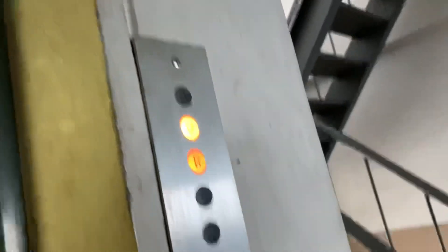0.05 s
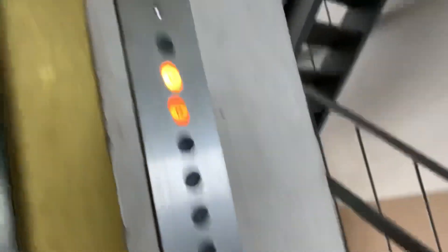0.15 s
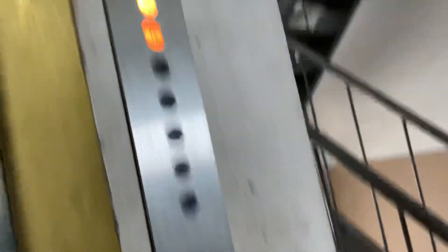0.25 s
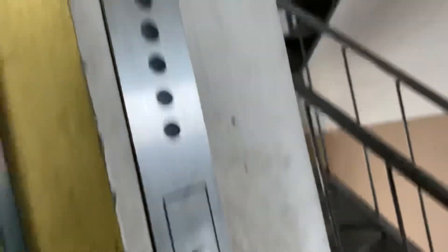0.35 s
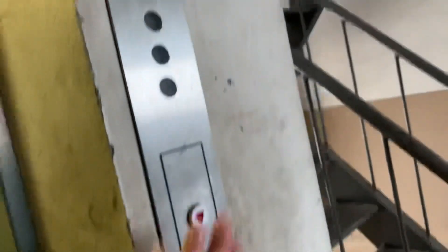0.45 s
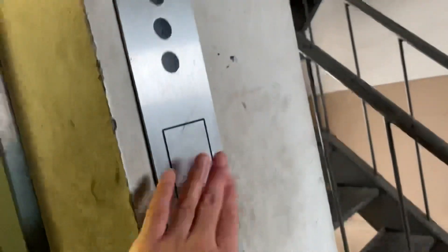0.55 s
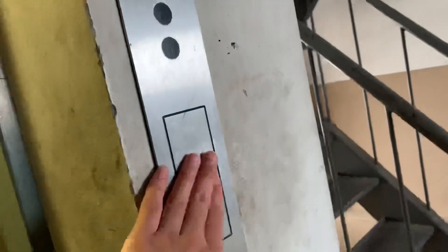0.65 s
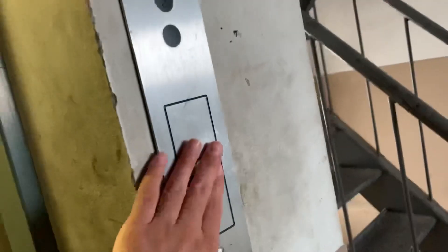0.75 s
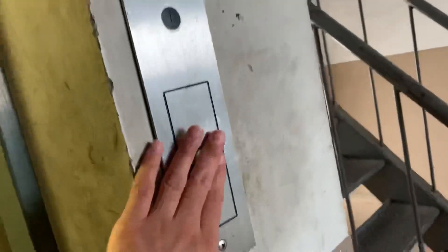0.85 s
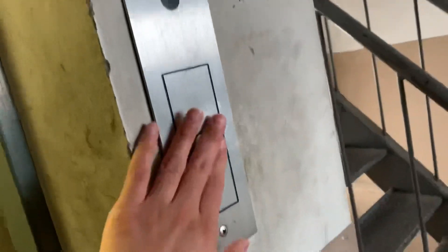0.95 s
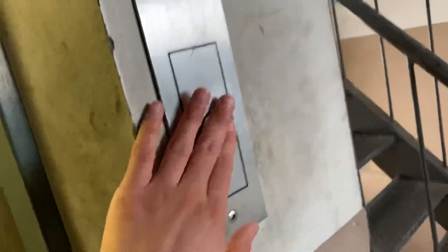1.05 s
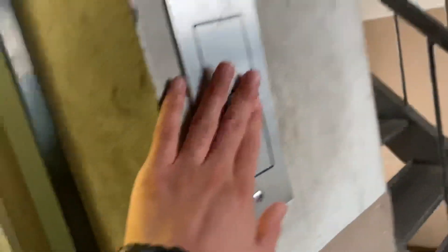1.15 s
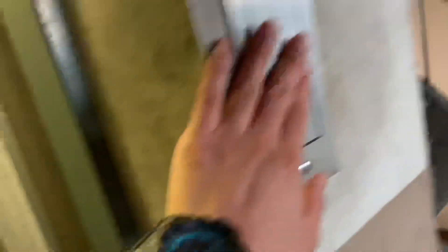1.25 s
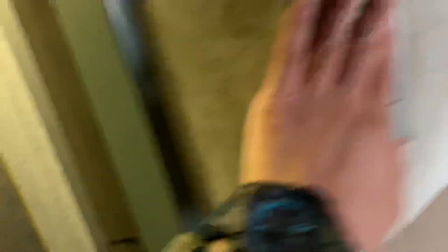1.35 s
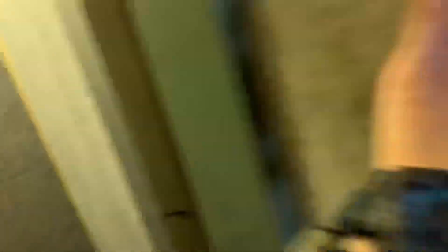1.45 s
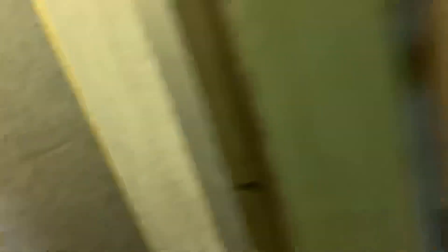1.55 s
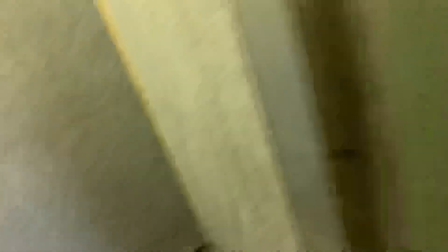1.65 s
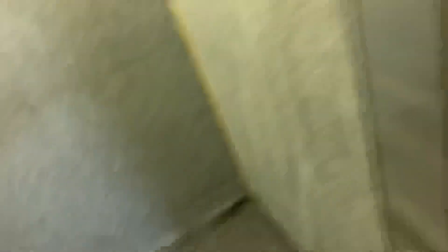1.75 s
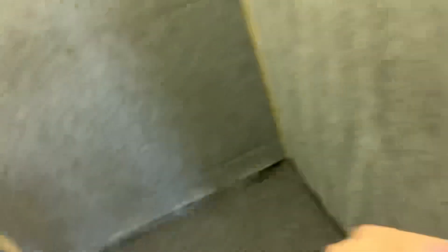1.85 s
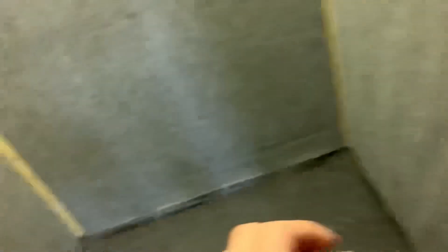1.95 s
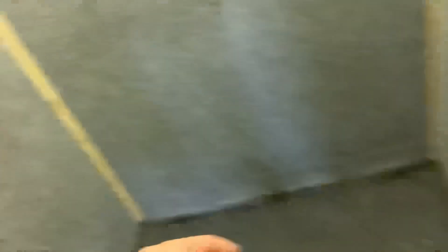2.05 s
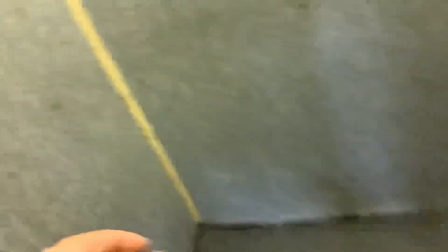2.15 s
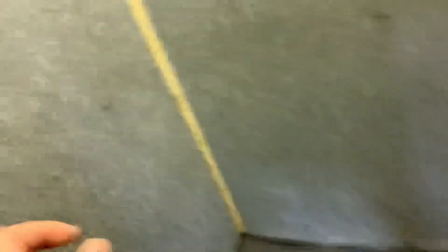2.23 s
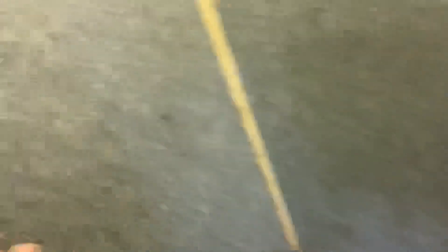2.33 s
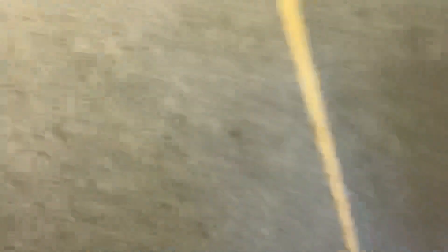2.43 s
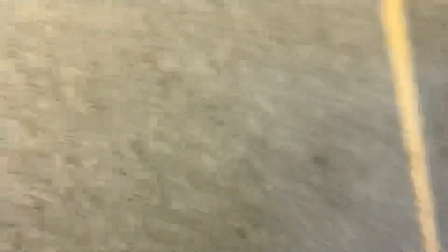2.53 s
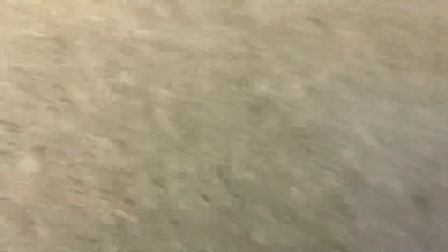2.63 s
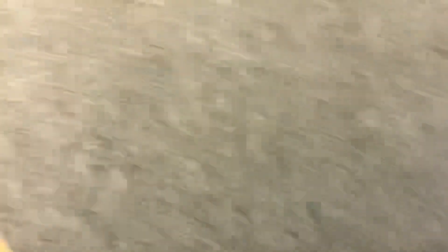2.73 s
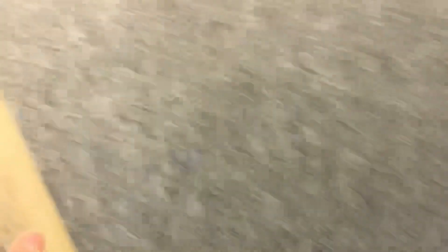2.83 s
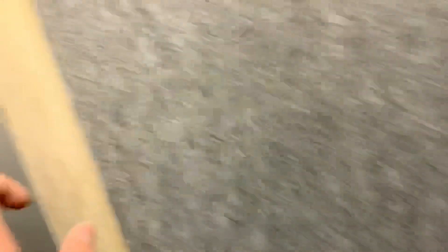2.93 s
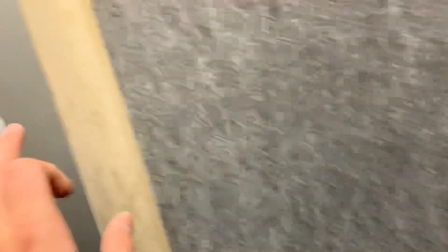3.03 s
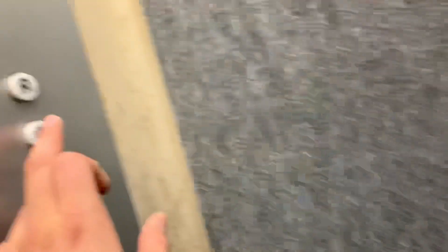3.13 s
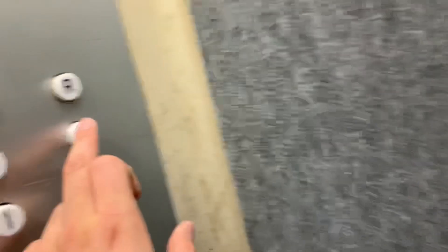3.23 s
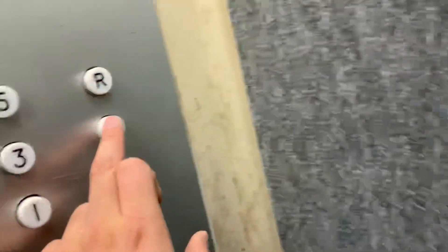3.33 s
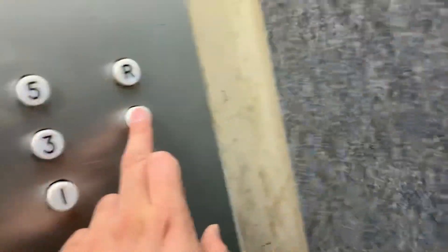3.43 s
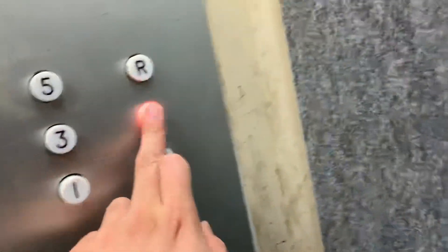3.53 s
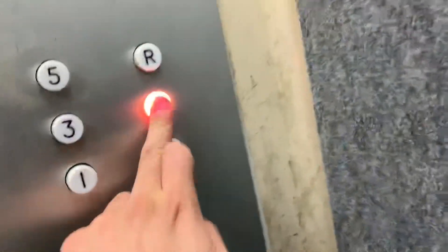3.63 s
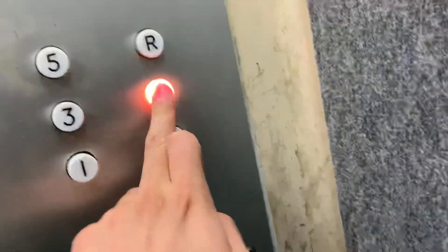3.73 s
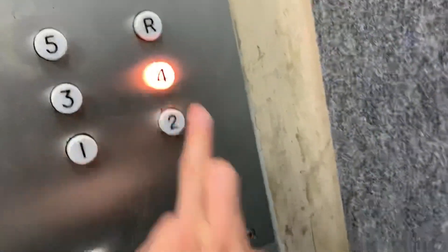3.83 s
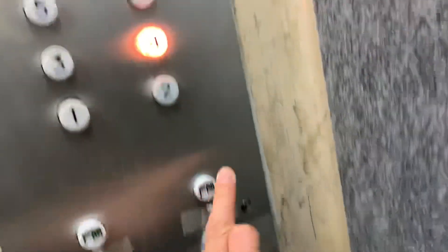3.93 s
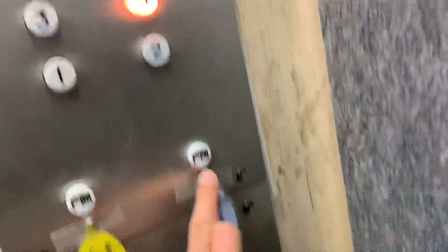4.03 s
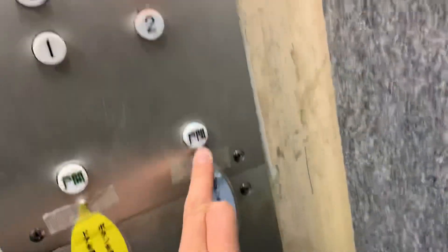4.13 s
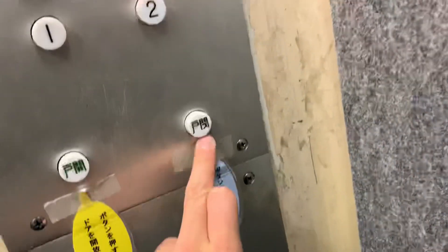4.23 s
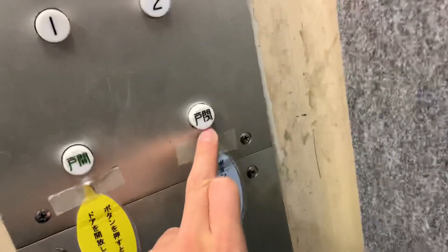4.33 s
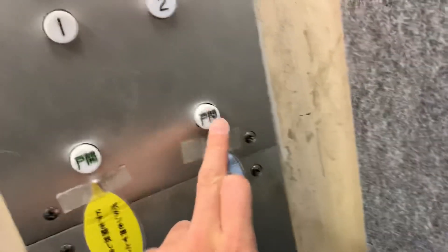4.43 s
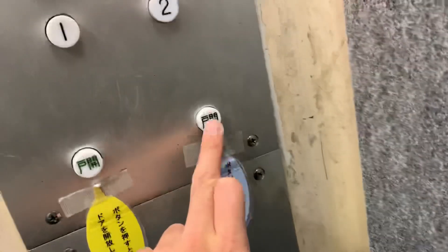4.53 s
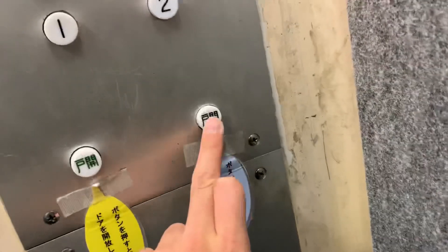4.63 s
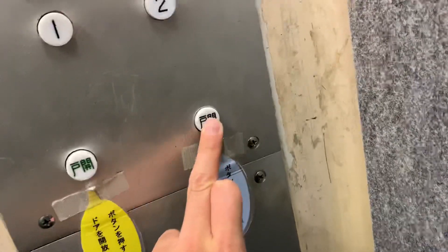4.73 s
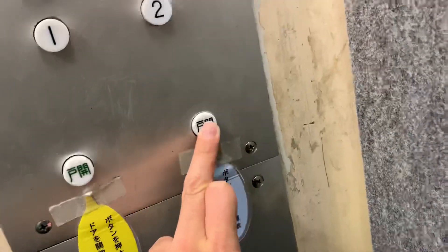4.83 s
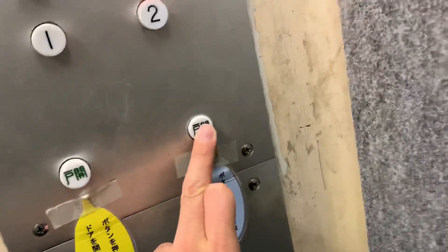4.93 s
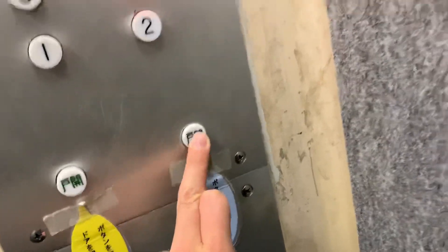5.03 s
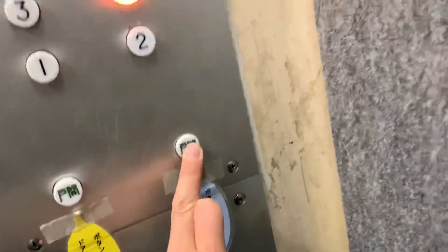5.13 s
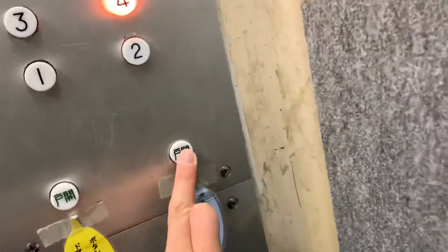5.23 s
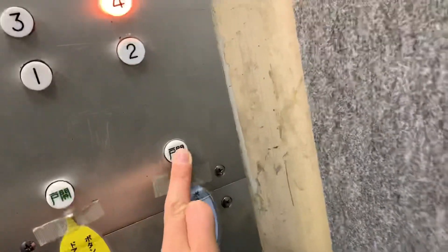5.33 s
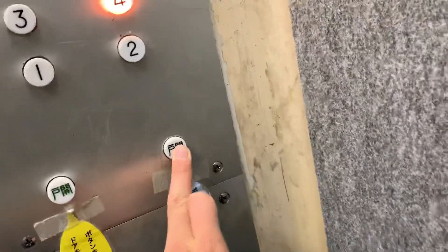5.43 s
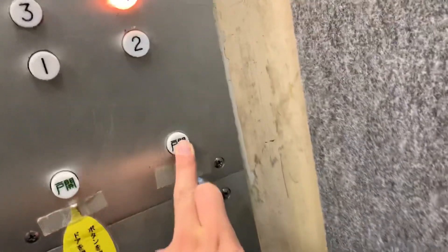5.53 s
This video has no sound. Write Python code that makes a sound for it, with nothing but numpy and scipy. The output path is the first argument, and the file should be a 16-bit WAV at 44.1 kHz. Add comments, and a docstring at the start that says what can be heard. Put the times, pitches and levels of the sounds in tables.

```python
"""An old lift, heard from a hand-held phone. From the start, machinery rumbles, hums and whines, and
clothes rustle. At 0.7 s and 1.5 s a hand taps the steel plate by the door, which clicks and rings.
From 1.7 s feet step into the car: the floor thuds and shudders, the door's hum fades, a heel taps and
a sole drags. Then a finger presses buttons that snap and squeak. A new hum starts with the press near
3.9 s; the loudest snap comes at 4.3 s, followed by the pings of a spring and a few soft rubs and thuds."""
import sys
import numpy as np
from scipy import signal
from scipy.fft import rfft, irfft, next_fast_len
from scipy.io import wavfile
from scipy.ndimage import uniform_filter1d, map_coordinates

SR = 44100
rng = np.random.default_rng(int(sys.argv[2]) if len(sys.argv) > 2 else 0)


def materialize(psi):
    """Save the field psi as 16-bit PCM at rate SR to the path in sys.argv[1].

    A 1-D psi becomes a single channel; in a 2-D psi each row is a channel.
    """
    bounded = np.clip(np.atleast_2d(psi).T, -1, 1)
    quanta = np.round(bounded * 32767).astype(np.int16)
    wavfile.write(sys.argv[1], SR, quanta)


N = 246078
TIME = np.arange(N) / SR
INSIDE_S = 1.7  # when we step into the car

# Levels compare the rows of a table. A fade time (t60) is how long a sound takes to drop by 60 dB.
# The tone colour of five noises, from low to high: (frequency [Hz], level [dB])
RUMBLE_COLOUR = [(8.8, -47), (15, -32), (27, -0.5), (48, -1.5), (99, -18), (129, -20), (140, -15.5),
                 (180, -46.5), (310, -120)]
DRONE_COLOUR = [(76, -0.5), (130, -10), (173, -4.5), (247, -8.5), (301, -11), (553, -17), (1100, -29.5),
                (1430, -33), (2420, -120)]
RUSTLE_COLOUR = [(300, 4.5), (700, -1), (1500, -2.5), (3000, -5.5), (6000, -9), (8000, -18.5), (11000, -23)]
FIZZ_COLOUR = [(5000, -30), (8000, 6), (11500, 4), (15000, 0.5)]
SOLE_COLOUR = [(500, -12), (950, -8.5), (1250, -2.5), (1650, -11.5), (2000, -7.5), (3000, -8.5),
               (6000, -12), (12000, -16), (16500, -28.5)]
# How alike a noise is on the left and right: (frequency [Hz], likeness [0 to 1])
STEREO_LIKENESS = [(30, 1), (100, 0.92), (290, 0.79), (640, 0.36), (1400, 0), (16000, 0)]
# How long the steel car echoes: (frequency [Hz], fade time [s])
ECHO_FADES = [(200, 0.23), (2000, 0.11), (6000, 0.086), (10000, 0.081), (14000, 0.037)]
# How hard the car sways: (time [s], rumble level [dB])
CAR_SWAY = [(0, -38), (.48, -41.5), (.57, -27), (.7, -40.5), (1.5, -40), (1.77, -25), (1.9, -32.5),
            (2.2, -33.5), (2.36, -27), (2.5, -31.5), (2.75, -35), (3.05, -26), (3.2, -31.5), (3.45, -24.5),
            (3.95, -33), (4.12, -27.5), (4.27, -43.5), (4.6, -35), (4.88, -31.5), (5.27, -31), (5.58, -31)]
# How much the person moves: (time [s], rustle level [dB], fizz level [dB])
BODY_MOTION = [(0, -54.5, -69), (.23, -49, -91), (.57, -41.5, -47.5), (.8, -48.5, -54.5), (1.1, -52.5, -85),
               (1.35, -51.5, -63), (1.44, -46, -51), (1.77, -38.5, -45.5), (2.19, -43.5, -52.5),
               (2.47, -40, -50.5), (2.61, -42, -60), (2.72, -39.5, -51), (2.95, -44.5, -53.5),
               (3.1, -42, -54), (3.25, -45, -68.5), (4.12, -51.5, -65), (4.27, -58, -74), (4.5, -52.5, -88),
               (4.72, -61.5, -77), (5.33, -54.5, -71.5), (5.58, -47.5, -57.5)]
# The notes of a dragged sole: (pitch [Hz], width [Hz], level [dB])
SOLE_NOTES = [(930, 51, -1), (1595, 39, 7.5), (1770, 70, 4), (2570, 90, -3), (3200, 100, -6),
              (2205, 78.3, -11), (5125, 110, -4.5)]
# The notes of the car floor and of the door plate: (pitch [Hz], level [dB], fade time [s])
FLOOR_NOTES = [(42.9, -21, 0.83), (65.3, -1, 0.6), (93, 1, 0.17), (116, -1, 0.077), (157, -4, 0.91),
               (165.7, -8.5, 0.85), (201, -9.5, 0.12), (242.7, 2, 0.16), (294, -0.5, 0.115),
               (338.3, -4, 0.25), (402.7, -8, 0.6), (470, -8.5, 0.15), (560, -6.5, 0.39)]
PLATE_NOTES = [(461.4, 2, 0.58), (810, -8, 0.1), (1510, -13, 0.23), (1666, 2, 0.045), (1750, 1, 0.05),
               (2024, -11, 0.46), (2120, -15, 0.4), (2240, -7.5, 0.82), (2800, -9, 0.077),
               (2710, -7.5, 0.36), (3140, -18, .14), (4240, -8, .2), (4106, 2, 0.034), (3920, -9, 0.14)]
# Blows on the floor and wall: (time [s], level [dB], favoured pitch [Hz])
FLOOR_THUDS = [(1.739, -22.5, 60), (2.244, -19.5, 290), (2.256, -18.5, 112), (2.271, -18, 230),
               (2.284, -22, 260), (2.365, -31, 480), (2.331, -27, 44.4), (2.8375, -17, 350),
               (2.838, -15.5, 143.6), (2.864, -39, 300), (3.287, -17, 113.4), (3.394, -18.5, 109),
               (3.488, -29.5, 334), (3.511, -23, 43.5), (3.87, -20, 212), (4.334, -21.5, 370),
               (4.63, -29.5, 295.7), (3.903, -32.5, 161), (4.349, -25.5, 159), (4.298, -31, 326),
               (5.1, -32, 236), (5.28, -34, 257)]
# Taps on the door plate: (time [s], level [dB], favoured pitch [Hz], damping by the hand [dB/s])
HAND_TAPS = [(0.7124, -39.5, 4140, 18), (0.7137, -39, 1910, 22), (0.721, -51, 464, 95),
             (0.737, -49, 2200, 10), (0.764, -51.5, 455, 30), (1.5, -46, 450, 120),
             (1.561, -41.5, 1900, 600), (1.564, -40.5, 450, 300), (1.61, -48.5, 450, 300)]
# Short pitched ticks, taps and squeaks: (time [s], length [s], pitch [Hz], width [Hz], level [dB])
PITCHED_TICKS = [(1.605, 0.0138, 1520, 200, -48), (1.497, .012, 1500, 250, -44),
                 (1.53, .016, 1540, 200, -46), (1.606, 0.011, 2600, 300, -45),
                 (1.691, 0.014, 2210, 300, -42), (1.75, 0.012, 2000, 300, -41.5),
                 (2.832, 0.0063, 1410, 890, -33), (3.185, 0.01, 1900, 900, -42),
                 (3.195, 0.025, 1840, 800, -40), (3.416, 0.002975, 2550, 400, -35),
                 (3.417, .003, 6400, 1800, -33.5), (3.8495, 0.0041, 4200, 700, -39),
                 (4.789, 0.045, 3120, 348, -61.5), (4.806, 0.057, 476, 45, -45.5),
                 (5.046, 0.071, 1490, 200, -56.5)]
# The notes of a button's spring: (pitch [Hz], level [dB], fade time [s])
SPRING_NOTES = [(7300, 0, 0.02), (14750, -4, .03)]
# The spring's jumps in its guide: (time [s], level [dB])
SPRING_JUMPS = [(4.338, -35), (4.367, -29.5), (4.374, -38.5), (4.508, -40), (4.52, -33), (4.528, -39),
                (4.555, -49)]
# The notes of the button panel, used to colour every click: (pitch [Hz], width [Hz], level [dB])
PANEL_NOTES = [(898, 610, 5.5), (2583, 370, -5), (3390, 450, -2.5), (4370, 220, -1), (5030, 390, -5.5),
               (5800, 200, -3.5), (6900, 440, -8.5), (8700, 450, -0.5), (10690, 430, -0.5),
               (11700, 460, -14), (15100, 2000, 0)]
# Sharp clicks and a few soft, longer rubs:
# (time [s], level [dB], pitch [Hz], fade time [s], rattle compared with the crack [dB])
CLICKS_AND_RUBS = [(0.712, -8, 11500, 0.024, -30), (0.759, -17, 13900, 0.024, -23),
                   (1.499, -34, 2800, 0.013, -30), (1.56, -31, 1900, 0.036, -34),
                   (1.5873, -14.5, 12000, 0.022, -27), (1.605, -20.5, 8440, 0.027, -44),
                   (2.8337, -24, 1330, 0.019, -3.5), (3.3734, -37, 9000, 0.022, -23),
                   (3.4165, -17, 6560, 0.006, -10), (3.4868, -22.5, 2900, 0.014, -4),
                   (3.612, -32, 12800, 0.056, -19), (3.8655, -13.5, 5430, 0.0047, -20),
                   (3.866, -4, 10200, 0.011, -27), (3.8705, -8.5, 5160, 0.0045, -14),
                   (4.1593, -32, 7500, 0.006, -16), (4.1658, -22, 13500, 0.006, -23),
                   (4.299, -18.5, 9400, 0.02, -12), (4.326, -20, 9000, 0.014, -4),
                   (4.3336, 9.5, 11200, 0.0093, -19.5), (4.452, -32.5, 2030, 0.025, -27.5),
                   (4.52, -21.5, 5900, 0.02, -7.5), (4.528, -30.5, 10350, 0.0066, 3.5),
                   (4.621, -39.5, 5000, 0.019, 11), (4.625, -15.5, 12500, 0.01, -21.5),
                   (4.6504, -38, 4930, 0.003, 14), (4.7781, -52.5, 8940, 0.28, -2),
                   (5.048, -48, 8030, 0.067, -1.5), (5.289, -41, 1190, 0.16, -5)]


def amp(db):
    """Turn decibels into a number to multiply by."""
    return np.exp(np.asarray(db) * np.log(10) / 20)


def unit(x):
    """Scale a signal to an average (rms) strength of 1."""
    return x / np.sqrt(np.mean(x ** 2) + 1e-20)


def after(s):
    """Seconds since time s, zero before it."""
    return np.maximum(TIME - s, 0)


def along(points, hz):
    """Read between a table's (frequency, value) points, with octaves evenly spaced."""
    f, v = np.transpose(points)
    return np.interp(np.log(hz + 1), np.log(f + 1), v)


def curves(rows):
    """Join a table's points in time: one curve for each column after the first."""
    s, *columns = np.transpose(rows)
    return [np.interp(TIME, s, column) for column in columns]


def wobble(rate):
    """A smooth curve through rate random values a second."""
    return map_coordinates(rng.standard_normal(int(N * rate / SR) + 4), [TIME * rate])


def filtered(x, response):
    """Multiply each frequency in x by response(frequency)."""
    n = x.shape[-1]
    size = next_fast_len(n + 4096)
    return irfft(rfft(x, size) * response(np.fft.rfftfreq(size, 1 / SR)), size)[..., :n]


def resonance(f, hz, width_hz):
    """How strongly something that rings at hz answers the frequencies f."""
    return 1j * f * width_hz / (hz * hz - f * f + 1j * f * width_hz)


def noise(gain):
    """Stereo noise shaped by gain(frequency): both sides alike in the bass, unrelated higher up."""
    def shape(f):
        angle = np.arccos(np.clip(along(STEREO_LIKENESS, f), -1, 1)) / 2
        return gain(f) * [np.cos(angle), np.sin(angle)]
    mid, side = filtered(rng.standard_normal((2, N)), shape)
    return unit(np.array([mid + side, mid - side]))


def patchy(x, depth_db):
    """Make small random patches of time and pitch louder or softer."""
    bands = signal.stft(x, nperseg=256)[2]
    patches = uniform_filter1d(rng.standard_normal(bands.shape[1:]), size=4, axis=0)
    patches = unit(uniform_filter1d(patches, size=8, axis=1))
    return unit(signal.istft(bands * amp(depth_db * patches), nperseg=256)[1][:, :N])


def ring(notes, t, scatter_db, split):
    """A struck object: each note, at a random strength, is two close tones that throb as they fade."""
    out = 0
    for hz, db, t60 in notes:
        level, apart = rng.standard_normal(2)
        pair = np.sin(2 * np.pi * hz * t) + 0.83 * np.sin(2 * np.pi * hz * (1 + split * apart) * t)
        out = out + amp(db + scatter_db * level - 60 * t / t60) * pair
    return out


def add(track, s, sound):
    """Mix a sound into the track at s seconds."""
    part = track[..., round(s * SR):][..., :sound.shape[-1]]
    part += sound[..., :part.shape[-1]]


def echo(sound, shaft_db=-12, shaft_times_longer=5.5, dull_above_hz=3500):
    """The steel car echoes briefly; the shaft beyond answers weaker, longer and duller."""
    hz, t, bands = signal.stft(rng.standard_normal((2, SR // 3)), SR, nperseg=128)
    fall_db = -60 * t / along(ECHO_FADES, hz)[:, None]
    shaft = amp(shaft_db + fall_db / shaft_times_longer) / (1 + (hz[:, None] / dull_above_hz) ** 2)
    tail = signal.istft(bands * (amp(fall_db) + shaft), SR, nperseg=128)[1]
    delayed = np.pad(sound, ((0, 0), (60, 0)))
    return signal.fftconvolve(delayed, tail / np.linalg.norm(tail[0]), axes=1)


def machinery():
    """A deep rumble follows the car's sway; the shaft's drone is a little louder inside the car."""
    rumble_db = curves(CAR_SWAY)[0] + 0.986 * wobble(7.4)
    rumble = amp(rumble_db) * noise(lambda f: amp(along(RUMBLE_COLOUR, f)))
    drone_db = -47 + 1.5 * (TIME > INSIDE_S) + 2.5 * wobble(9.9)
    return rumble + amp(drone_db) * noise(lambda f: amp(along(DRONE_COLOUR, f)))


def shudder(rise_s=0.0016, t60=0.91, dull_above_hz=510):
    """Each thud shakes the car: a dull noise with the floor's notes in it swells and dies away."""
    power = np.zeros(N)
    for s, db, _ in FLOOR_THUDS:
        power[round(s * SR)] = amp(db - 12) ** 2
    rise, fall = np.exp(-1 / (rise_s * SR)), amp(-60 / (t60 * SR)) ** 2
    power = signal.lfilter([1 - rise], [1, -rise], power)
    level = np.sqrt(signal.lfilter([1], [1, -fall], power))
    floor = lambda f: 4.5 + sum(np.abs(resonance(f, hz, 18)) ** 2 for hz, _, _ in FLOOR_NOTES)
    return level * noise(lambda f: amp(along(DRONE_COLOUR, f)) * floor(f) / (1 + (f / dull_above_hz) ** 2))


def door_hum(fade_from_s=2.02, fade_db_per_s=32):
    """Mains electricity hums by the door and fades once we are in the car."""
    low, middle, high = (np.sin(2 * np.pi * hz * TIME) for hz in (119.5, 240, 358))
    tones = low + amp(-7 + wobble(3.4)) * middle + amp(-15.5) * high
    return amp(-44 - fade_db_per_s * after(fade_from_s) + 0.9 * wobble(6.05)) * tones


def car_hum(start_s=3.88, hz=105.5, rise_s=0.04, fade_db_per_s=3, waver_db=3):
    """An unsteady hum and its octave start in the car with a button press."""
    level = np.minimum(after(start_s) / rise_s, 1) * amp(-43 - fade_db_per_s * after(start_s))
    phase = 2 * np.pi * hz * TIME
    return level * sum(amp(waver_db * wobble(9)) * np.sin(k * (phase + 0.6 * wobble(8))) for k in (1, 2))


def whine(hz=1250, width_hz=110, rise_s=0.094):
    """The machinery's fuzzy whine swells in, wavers, and is weaker inside the car."""
    level = amp(-56 - 2.5 * (TIME > INSIDE_S) + 2.5 * wobble(2.91))
    swell = 1 - 0.5 * np.exp(-(TIME / rise_s) ** 2)
    return level * swell * noise(lambda f: resonance(f, hz, width_hz) ** 2)


def small_rattles(per_s=110, spread_db=8, middle_hz=1900, t60=0.012):
    """Things on the moving body tick at random times, pitches and places from left to right."""
    out, t = np.zeros((2, N)), TIME[:SR // 40]
    for when, size, pitch, side in rng.random((int(per_s * N / SR), 4)):
        hz = middle_hz * 4 ** (pitch - 0.5)
        tick = amp(spread_db * size ** 2 - 60 * t / t60) * np.sin(2 * np.pi * hz * t)
        add(out, when * N / SR, tick * np.sqrt([[side], [1 - side]]))
    return out


def clothes():
    """Cloth and moving air hiss as the person moves; small rattles follow the rustle's level."""
    rustle_db, fizz_db = curves(BODY_MOTION)
    flutter_db = 0.3 * wobble(15) + 0.49 * wobble(60)
    cloth = patchy(noise(lambda f: amp(along(RUSTLE_COLOUR, f))), depth_db=1.5)
    fizz = amp(fizz_db + flutter_db) * noise(lambda f: amp(along(FIZZ_COLOUR, f)))
    return amp(rustle_db + flutter_db) * cloth + fizz + amp(rustle_db - 3) * small_rattles()


def dragged_sole(start_s=2.997, rise_s=0.022, hold_s=0.036, t60=0.2, narrowest_hz=60):
    """A rubber sole drags once, sticking and slipping; the rubber damps its notes."""
    level = np.minimum(after(start_s) / rise_s, 1) * amp(-26.5 - 60 * after(start_s + hold_s) / t60)
    judder = amp(0.8 * wobble(90))
    notes = lambda f: sum(amp(db) * np.abs(resonance(f, hz, max(width_hz, narrowest_hz))) ** 2
                          for hz, width_hz, db in SOLE_NOTES)
    return level * judder * noise(lambda f: amp(along(SOLE_COLOUR, f)) * (1 + 3.7 * notes(f)))


def thuds(firm_db=-20, firm_rise_s=0.002, damped_t60=0.52):
    """Soft blows ring the floor; the foot damps it, so part of the sound dies early."""
    out, t = np.zeros((2, N)), TIME[:SR // 2]
    damping = 1 + amp(-1.5 - 60 * t / damped_t60)
    for s, db, hz in FLOOR_THUDS:
        floor = ring(FLOOR_NOTES, t, scatter_db=3.5, split=0.034) * damping
        blow = filtered(floor, lambda f: resonance(f, hz, 0.9 * hz) ** 2)
        blow *= 1 - np.exp(-t / (firm_rise_s * amp(firm_db - db)))  # softer blows rise more slowly
        blow = amp(db) * blow[None] / np.abs(blow).max()
        add(out, s, blow)
        add(out, s, amp(-16) * echo(blow))
    return out


def plate_taps(buzz_depth=0.45):
    """A hand rings the steel plate and damps it by resting there; loose parts add a buzz."""
    out, t = np.zeros((2, N)), TIME[:SR // 2]
    for s, db, hz, damping in HAND_TAPS:
        plate = ring(PLATE_NOTES, t, scatter_db=2, split=0.012)
        tap = filtered(plate, lambda f: resonance(f, hz, 0.8 * hz))[None]
        buzz = unit(uniform_filter1d(rng.standard_normal(len(t)), size=300))
        tap *= amp(db - damping * t) * (1 + buzz_depth * buzz)
        add(out, s, tap)
        add(out, s, amp(-5) * echo(tap))
    return out


def pitched_ticks():
    """Short ticks, taps and squeaks: noise around one pitch, with a faint octave above."""
    out = np.zeros((2, N))
    for s, length, hz, width_hz, db in PITCHED_TICKS:
        t = TIME[:round(length * 2 * SR)]
        band = lambda f, k: resonance(f, k * hz, k * width_hz) ** 2
        hiss = rng.standard_normal((2, len(t)))
        tone = unit(filtered(hiss, lambda f: band(f, 1) + amp(-24) * band(f, 2)))
        swell = np.minimum(t / (0.17 * length), 1) / (1 + (t / length) ** 8)
        add(out, s, amp(db) * swell * tone)
    return out


def spring(rise_s=0.001):
    """The spring under a button pings in short runs as it is pressed and let go."""
    out, t = np.zeros((2, N)), TIME[:SR // 12]
    for s, db in SPRING_JUMPS:
        ping = amp(db) * ring(SPRING_NOTES, t, scatter_db=2, split=0.025)[None]
        ping *= np.minimum(t / rise_s, 1)
        add(out, s, ping)
        add(out, s, amp(-5) * echo(ping))
    return out


def clicks(lead_s=0.003, box_hz=594, dull_above_hz=8000):
    """Door plate, heel and buttons click: a faint touch, a crack, a rattle. Long, soft ones are rubs."""
    out, t = np.zeros((2, N)), TIME[:SR // 8]
    since_crack = np.maximum(t - lead_s, 0)
    colour = lambda f: 0.28 + sum(amp(db) * np.abs(resonance(f, hz, width_hz)) ** 2
                                  for hz, width_hz, db in PANEL_NOTES)
    box = lambda f: amp(-6) * resonance(f, box_hz, 0.9 * box_hz)  # the hollow behind the panel
    burst = lambda t, t60, rise_s=0.0007: (1 - np.exp(-t / rise_s)) * amp(-60 * t / t60)
    first_touch = amp(-29) * burst(t, t60=0.024)
    for s, db, hz, t60, rattle_db in CLICKS_AND_RUBS:
        rattle_hz = 0.38 * hz
        dull = lambda f: resonance(f, rattle_hz, 2 * rattle_hz) / (1 + (f / dull_above_hz) ** 2)
        crack, rattle = rng.standard_normal((2, 2, len(t)))
        crack = unit(filtered(crack, lambda f: colour(f) * resonance(f, hz, 1.4 * hz) ** 2))
        rattle = unit(filtered(rattle, lambda f: colour(f) * dull(f) + box(f)))
        crack *= first_touch + burst(since_crack, t60)
        rattle *= amp(rattle_db) * burst(since_crack, 7.4 * t60, rise_s=0.00032)
        click = amp(db) * (crack + rattle)
        add(out, s - lead_s, amp(-7.5) * click)
        add(out, s - lead_s, amp(-10) * echo(click))
    return out


def scene():
    """All the sounds as they reach the phone's two microphones."""
    background = machinery() + shudder() + door_hum() + car_hum() + whine() + clothes()
    return background + dragged_sole() + clicks() + spring() + thuds() + plate_taps() + pitched_ticks()


def record(dry):
    """The phone takes all treble from one microphone, late on the left, and cuts extreme lows and highs."""
    shared_above_hz, left_lag_s = 7400, 0.0002573
    bass_hz, dull_above_hz, top_hz = 28, 15900, 16640
    shared = lambda f: 1 / (1 + (shared_above_hz / (f + 1)) ** 26)
    lag = lambda f: np.exp(-1j * np.pi * f * left_lag_s * np.array([[1], [-1]]))
    band = lambda f: (f < top_hz) / np.sqrt((1 + (f / dull_above_hz) ** 60) * (1 + (bass_hz / (f + 1)) ** 6))
    lower = filtered(dry, lambda f: np.sqrt(1 - shared(f)))
    treble = filtered(dry[[1, 1]], lambda f: np.sqrt(shared(f)) * lag(f))
    return filtered(np.clip(lower + treble, -1, 1), band)


dry = scene()
out = record(dry)
materialize(out)
```